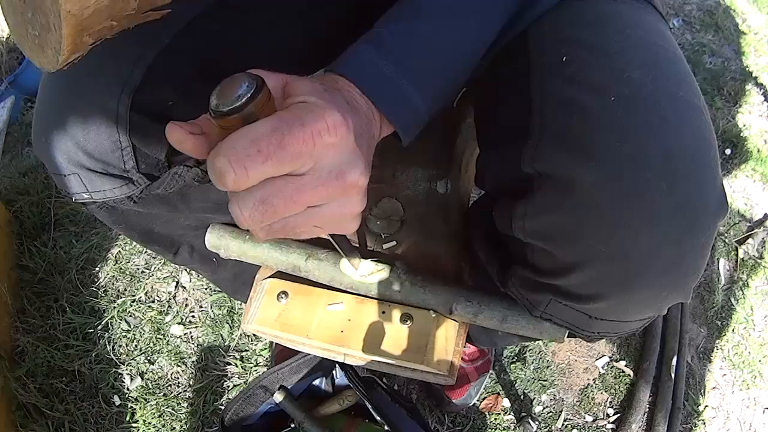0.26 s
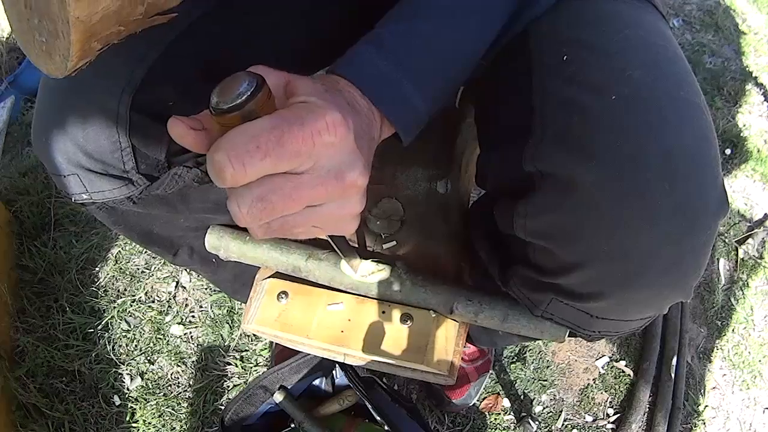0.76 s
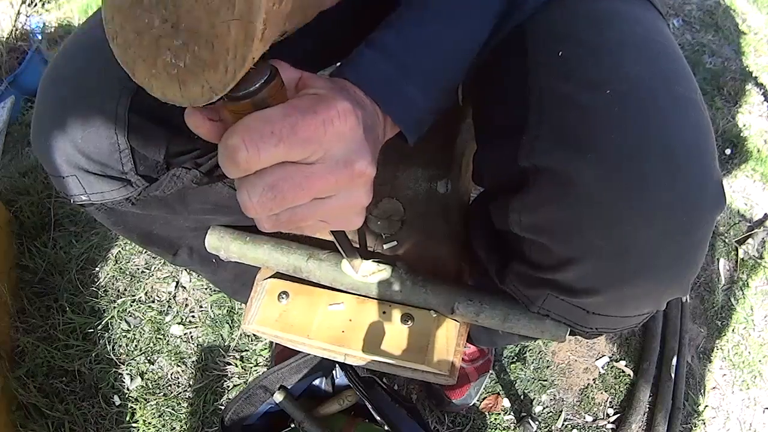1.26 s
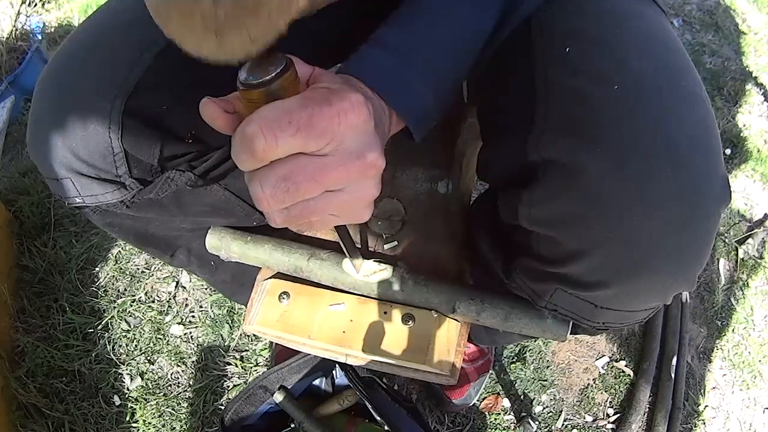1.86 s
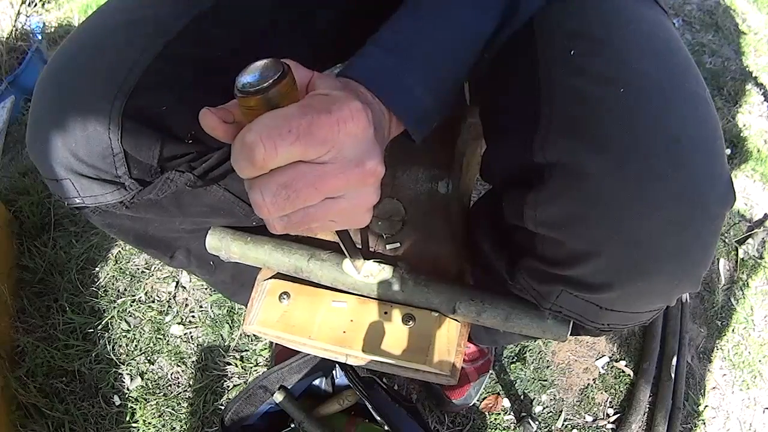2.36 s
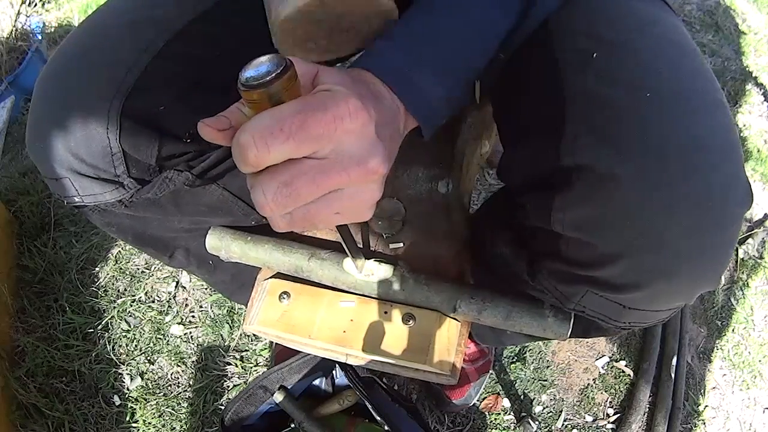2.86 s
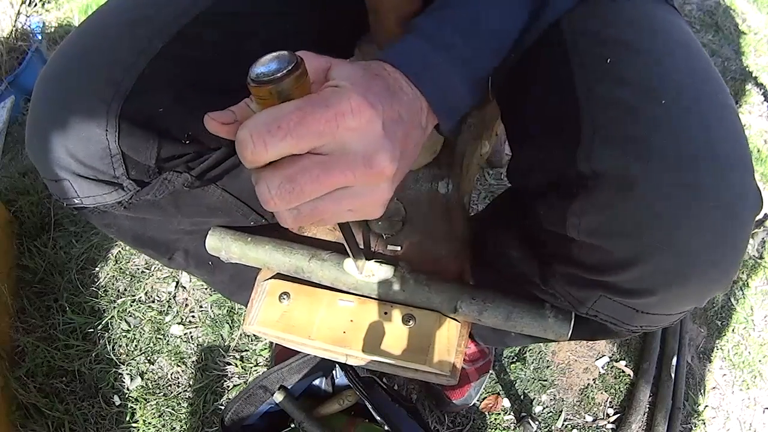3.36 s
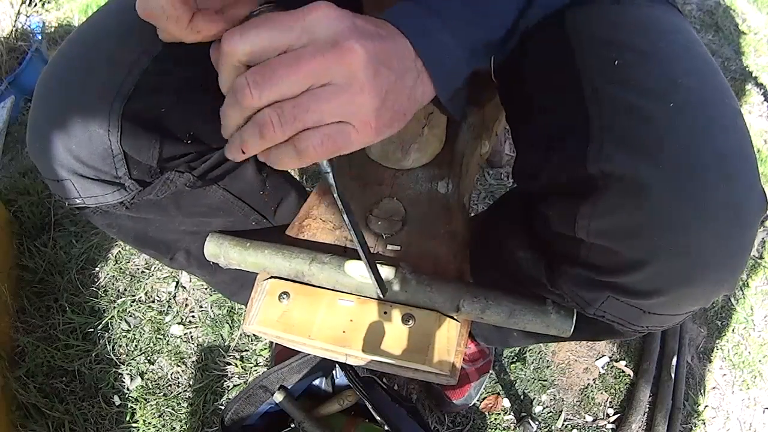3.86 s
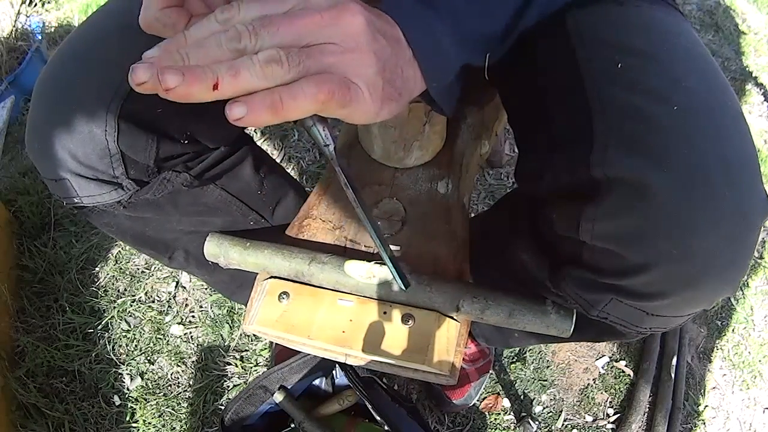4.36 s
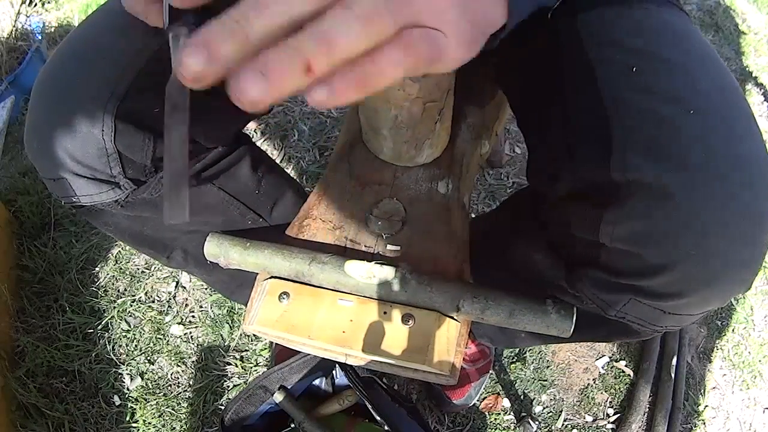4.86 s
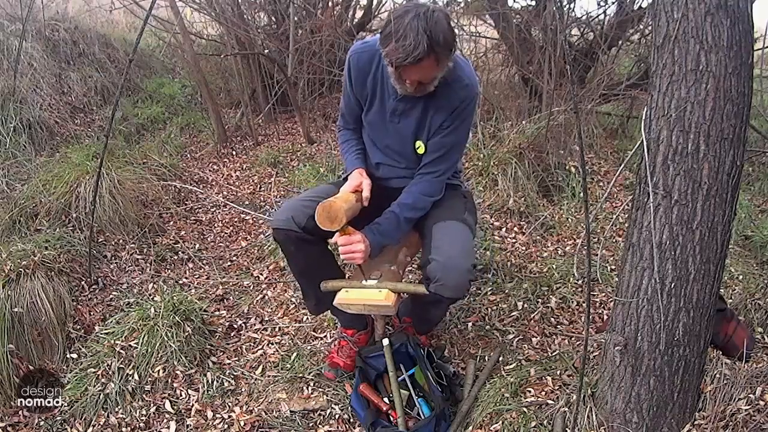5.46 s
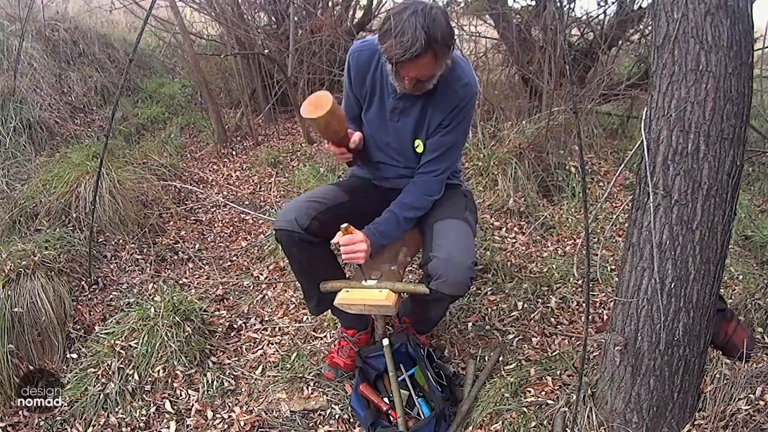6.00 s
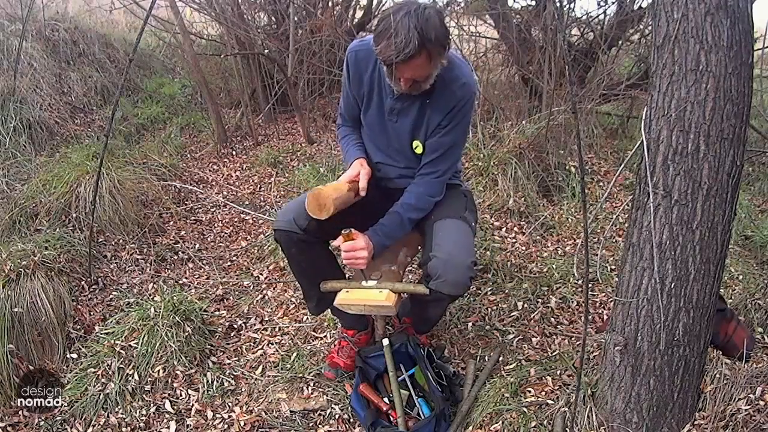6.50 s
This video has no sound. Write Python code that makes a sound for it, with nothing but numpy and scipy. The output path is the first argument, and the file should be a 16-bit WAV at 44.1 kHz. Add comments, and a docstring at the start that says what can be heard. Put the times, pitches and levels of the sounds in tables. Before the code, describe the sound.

A mallet cracks sharply on a chisel twice, wood clacks and taps lightly, then one more hard blow lands, outdoors.

```python
"""Chisel into green wood

Outdoors, three hard mallet blows drive a chisel into a green stick on a chopping block: the handle
cracks, fibres crush, and chisel, stick and block ring. Between blows the mallet slides down and is
laid aside, wood knocks on wood, steel and chips tick, and sleeves swish over quiet woodland air.
A dull low background noise swells after the second blow."""
import sys
import numpy as np
from scipy import signal
from scipy.fft import rfft, irfft, next_fast_len
from scipy.io import wavfile

SR = 44100
rng = np.random.default_rng(int(sys.argv[2]) if len(sys.argv) > 2 else 0)


def inscribe(sig):
    """Save sig as 16-bit PCM at rate SR to the path in sys.argv[1].

    A 1-D sig is mono; a 2-D sig holds one channel per row.
    Samples are clipped to [-1, 1] before scaling.
    """
    pcm = np.round(np.clip(np.atleast_2d(sig).T, -1, 1) * 32767)
    wavfile.write(sys.argv[1], SR, pcm.astype(np.int16))


N = 297054
TIME = np.arange(N) / SR
AGE = TIME[:SR // 2]   # seconds since a contact
PADDED = next_fast_len(N + 4096, True)
BINS_HZ = np.maximum(np.arange(PADDED // 2 + 1) * SR / PADDED, 1)
CUTOFF_HZ = 11080

# Mallet blows. Each row: start in seconds, crack in dB, chisel in dB, chisel brightness in dB per
# octave, stick in dB, stick pitch in Hz, block in dB, bite in dB, bite pitch in Hz, rebound delay
# in seconds, rebound in dB relative to the blow.
BLOWS = [(1.913, -15, -17, 1, -14, 336.4, -30, -10.5, 2424, .028, -20.5),
         (2.425, -26.5, -34.5, -1, -25, 333, -15.5, 0.5, 863, .0125, -3.5),
         (6.249, -15, -15, -1.5, -13.5, 320.6, -44, -5.5, 1580, .0295, -25)]
# Light knocks. Each row: start in seconds, note in dB, pitch in Hz, clack in dB, block in dB.
KNOCKS = [(2.969, -15.5, 325, -26.5, -39), (2.9865, -21.5, 307, -27.5, -42), (2.996, -26, 207, -52, -61),
          (3.245, -30, 403, -37.5, -35), (3.2661, -28, 380, -44, -33.5), (3.386, -39.5, 367, -58, -54),
          (3.473, -38.5, 354, -56, -55), (3.613, -32.5, 379, -55, -49), (3.731, -38.5, 368, -63, -62),
          (5.11, -43, 403, -60, -77), (5.1832, -23.5, 329, -41.5, -72), (5.27, -27.5, 327, -46, -70),
          (5.503, -43, 310, -65, -75), (6.159, -44, 320, -54, -75)]
# Ticks of steel and chips. Each row: start in seconds, level in dB, centre in Hz.
TICKS = [(0.2805, -47.5, 5140), (1.2157, -45, 3900), (2.502, -41.5, 3940), (2.966, -36, 6130),
         (3.055, -43, 5440), (4.821, -43, 7550), (5.193, -45.5, 3200), (5.2095, -41, 1190),
         (5.866, -50.5, 4950), (6.150, -35.5, 4700)]
# Noise swells. Each row: time of reaching full level, attack, hold and release, all in seconds,
# sleeve swish in dB, low background noise in dB.
SWELLS = [(2.289, 0.078, .03, 0.067, -50, -49.5), (2.456, 0.028, 0.025, 0.043, -54.5, -44.5),
          (2.72, 0.52, .1, .33, -63, -54.5), (4.697, 0.26, .02, 0.092, -59.5, -69),
          (5.16, 0.43, 0.065, 0.16, -72.5, -62), (5.493, 0.097, 0.024, 0.03, -58.5, -59.5),
          (6.604, 0.0044, 0.086, .015, -47.5, -57), (6.73, 0.022, .02, .03, -54.5, -68)]

# What rings at a blow. Each row: frequency in Hz, level in dB, time to fall 60 dB in seconds.
CHISEL_MODES = [(592, -2.5, 0.025), (830, -2.5, 0.031), (980, -1.5, 0.048), (1337, -9, 0.035),
                (1715, -3.5, 0.073), (1888, 1, 0.029), (2408, -10, 0.053), (2790, -13, 0.092),
                (3400, -20, 0.05), (4090, -18, 0.026), (4550, -19, 0.031), (5500, -16, 0.026),
                (6330, -8.5, 0.042), (6840, -8, 0.017)]   # with its wooden handle
CAP_MODES = [(2850, 6.5, 0.021)]   # the handle's cap, tapped on the rebound
BLOCK_MODES = [(85, -18, 0.16), (443.4, 3, 0.087), (459, -21.5, 0.4), (874, -22, 0.24), (1020, 13, 0.023),
               (1303, -1, 0.047), (1380, -18.5, 0.23), (1664, -35, 0.52), (1660, 1.5, .02),
               (1810, 1, 0.026), (2910, -12, 0.036), (4070, 3.5, 0.011), (4100, -21, 0.078),
               (5850, -27, 0.1), (7360, -25, 0.03)]
GROUND_MODES = [(75.4, -35, 0.14)]
# The stick on its support. Each row: multiple of its pitch, level in dB, time to fall 60 dB in seconds.
STICK_MODES = [(.43, -21.5, 0.18), (.58, -16, 0.046), (.86, -6.5, 0.086), (.93, -24, 0.32), (1, 1.5, 0.11),
               (1.15, -6, .05), (1.361, -12.5, 0.035), (2.475, -33, 0.47)]
# The note of a knock. Each row: multiple of its pitch, level in dB, share of its ring time.
KNOCK_MODES = [(1, 2, 0.91), (1.85, -14, 0.38)]

# EQ curves of the noise layers. Each row: frequency in Hz, relative level in dB.
CRACK_EQ = [(150, 9), (500, -14), (1300, -2), (2500, 0), (4000, -1), (6500, -7), (8500, -6), (11000, -11)]
FIBRE_EQ = [(30, -24), (100, -21), (180, 4), (400, 1), (650, -7.5), (950, -5.5), (1300, -6), (1900, -13),
            (2700, -10.5), (4000, -15.5), (6500, -20), (11000, -32)]
ECHO_EQ = [(60, -4), (160, 1.5), (300, -1.5), (550, -20), (900, -12), (1500, -6), (2500, -15), (6500, -18),
           (11000, -30)]
CLACK_EQ = [(100, -13), (300, -0.5), (650, -0.5), (1000, -2), (1400, -6.5), (2000, -16), (4000, -27),
            (11000, -34)]
SLIDE_EQ = [(150, 2), (400, -1), (1400, -9), (2200, -2), (4000, -1), (4900, -7), (6500, -4), (8500, -8),
            (11000, -10.5)]
SWISH_EQ = [(100, -7), (600, -24), (1100, -6.5), (1700, 1.5), (3000, -1), (6000, -1.5), (9000, -4),
            (11000, -7)]
LOW_BACKGROUND_EQ = [(25, 7), (55, 13), (120, 7.5), (250, 2), (600, 2.5), (1100, 2), (1700, -2.5),
                     (2500, -11), (11000, -17)]
AIR_EQ = [(22, -23), (40, -6), (70, 0.5), (120, -3.0), (160, -9.5), (260, -13), (400, -14), (600, -14),
          (950, -12.5), (1300, -16), (2000, -18), (4000, -23.5), (7000, -26.5), (10500, -30)]

# Stereo phase of the close work and of the air. Each row: frequency in Hz, left lead in radians.
NEAR_PHASE = [(50, 0), (170, -.9), (500, -.95), (1700, -1.15), (3000, -.7), (6000, -.35), (11000, -.1)]
AIR_PHASE = [(80, 0), (170, -.3), (350, -.8), (520, -1.9), (1000, -2.2), (2000, -3), (3500, -2.5),
             (5000, -.8), (7000, -.1)]
# Pan of the close work. Each row: frequency in Hz, left over right in dB.
NEAR_BALANCE = [(100, 0.5), (350, -1), (700, -3), (1000, -1.7), (1700, 0), (3000, -.8), (11000, -1)]
# Stereo width of the noise. Each row: frequency in Hz, left-right likeness from 0 (wide) to 1 (mono).
NEAR_LIKENESS = [(60, 1), (250, 0.88), (2000, 0.85), (11000, 0.87)]
AIR_LIKENESS = [(30, 0.9), (90, 0.96), (200, 0.84), (400, 0.34), (2000, 0.62), (4500, 0.17), (10000, 0.53)]


def blows():
    """The mallet hits the handle, the edge bites, stick and block ring; the mallet bounces once."""
    tones, contacts = np.zeros(N), []
    block = ring(BLOCK_MODES, rise_cycles=4.6)
    cap = ring(CAP_MODES, rise_cycles=2.6)
    thud = ring(GROUND_MODES, rise_cycles=0.53)
    damping = np.maximum(loaded(hold_s=0.05), from_db(-3.5))   # the stick is never fully muted
    for (s, crack_db, chisel_db, brightness, stick_db, stick_hz, block_db,
         bite_db, bite_hz, rebound_s, rebound_db) in BLOWS:
        tilted = [(hz, db + brightness * np.log2(hz / 1800), t60) for hz, db, t60 in CHISEL_MODES]
        chisel = from_db(chisel_db) * ring(tilted, rise_cycles=2.4)
        tuned = [(stick_hz * k, db, t60) for k, db, t60 in STICK_MODES]
        stick = from_db(stick_db) * ring(tuned, rise_cycles=2.48) * damping
        add(tones, s, chisel + stick + from_db(block_db) * block + thud)
        # a brief squeak as the edge enters green wood
        add(tones, s + 0.001027, ring([(bite_hz, bite_db, .021)], rise_cycles=2.94))
        add(tones, s + rebound_s, from_db(rebound_db) * (chisel + from_db(crack_db) * cap))
        contacts += [(s, crack_db), (s + rebound_s, crack_db + rebound_db)]
    times, levels_db = np.transpose(contacts)
    return tones + crack(times, levels_db) + fibres(times, levels_db) + echo(times, levels_db)


def crack(times, levels_db, peak_db=7, width_hz=110):
    """A hard touch, then a rattle; the slim handle lifts the noise at its modes and radiates no bass."""
    touch = from_db(3.5) * decay(t60=0.012, rise_s=0.00018)
    rattle = from_db(-1) * decay(t60=0.028, rise_s=0.0018)
    peaks = [1 / (1 + (2 * (BINS_HZ - hz) / width_hz) ** 2) for hz, _, _ in CHISEL_MODES]
    handle = noise(CRACK_EQ, peaks_db=peak_db * np.max(peaks, axis=0))
    low_cut = signal.butter(2, 300, "high", fs=SR, output="sos")
    return signal.sosfilt(low_cut, bursts(times, levels_db, touch + rattle) * handle)


def fibres(times, levels_db):
    """Green fibres give way in a grainy crunch while the edge bears on them."""
    crush = decay(t60=0.62, rise_s=0.0023) * loaded(hold_s=0.036)
    return bursts(times, levels_db - 12.5, crush) * noise(FIBRE_EQ) * grain(per_s=870, depth_db=2.0)


def echo(times, levels_db):
    """Trunks and undergrowth scatter a faint tail back."""
    return from_db(-28.5) * bursts(times, levels_db, decay(t60=0.47, rise_s=0.017)) * noise(ECHO_EQ)


def knocks(ring_s=0.041):
    """Wood lands lightly on wood: a dull clack, a short low note and a little body from the block."""
    tones = np.zeros(N)
    block = ring(BLOCK_MODES[1:4], rise_cycles=0.89)
    for s, db, hz, _, block_db in KNOCKS:
        modes = [(k * hz, mode_db, share * ring_s) for k, mode_db, share in KNOCK_MODES]
        add(tones, s, from_db(db) * ring(modes, rise_cycles=0.77) + from_db(block_db) * block)
    times, _, _, clack_db, _ = np.transpose(KNOCKS)
    return tones + bursts(times, clack_db, decay(t60=0.052, rise_s=0.0011)) * noise(CLACK_EQ)


def mallet_slide(start_s=2.901, hold_s=0.149, landing_s=2.979):
    """The mallet scrapes onto the block with a gritty, rising rasp, pressing hardest as it lands."""
    touching = swell(start_s, attack_s=0.0024, hold_s=hold_s, release_s=0.018)
    pressure = swell(landing_s, attack_s=0.038, hold_s=0, release_s=0.038)
    rasp_hz = 5230 + 8900 * np.clip(TIME - start_s, 0, hold_s)
    narrow = noise([(910, 0), (9100, -60)])   # low noise, shifted up to a band around rasp_hz
    rasp = narrow * np.sqrt(2) * np.cos(2 * np.pi * np.cumsum(rasp_hz) / SR)
    scrape = (noise(SLIDE_EQ) + from_db(-4) * rasp) * grain(per_s=450, depth_db=3.0)
    return from_db(-52 + 7.5 * pressure) * touching * scrape


def ticks(half_width_octaves=0.64, chips_per_s=1.6, chip_db=-55.5, chip_hz=5500):
    """Steel and chips snap in tiny bursts of pitched noise; fainter chips tick at random."""
    track, shape = np.zeros(N), decay(t60=0.016, rise_s=0.00048)
    chips = [(s, chip_db, chip_hz) for s in TIME[rng.random(N) < chips_per_s / SR]]
    spread = 2 ** half_width_octaves
    for s, db, hz in TICKS + chips:
        band = signal.butter(2, [hz / spread, hz * spread], "band", fs=SR, output="sos")
        snap = signal.sosfilt(band, rng.standard_normal(len(AGE)))
        add(track, s, from_db(db) * shape * snap / snap.std())
    return track


def sleeves():
    """Sleeves swish in soft swells of bright, grainy noise."""
    level = np.linalg.norm([from_db(db) * swell(*timing) for *timing, db, _ in SWELLS], axis=0)
    return level * noise(SWISH_EQ) * grain(per_s=320, depth_db=1.5) * grain(per_s=45, depth_db=1.5)


def low_background():
    """A dull low background noise comes and goes, swelling most after the second blow."""
    level = np.linalg.norm([from_db(db) * swell(*timing) for *timing, _, db in SWELLS], axis=0)
    return level * noise(LOW_BACKGROUND_EQ)


def woodland_air():
    """A steady bed of soft rumble under a faint, wider hiss."""
    return from_db(-54) * noise(AIR_EQ, AIR_LIKENESS)


def ring(modes, rise_cycles):
    """Damped modes of alternating sign; each takes some cycles to build, so the lows bloom last."""
    return sum((-1) ** k * from_db(db) * decay(t60, rise_cycles / hz) * np.sin(2 * np.pi * hz * AGE)
               for k, (hz, db, t60) in enumerate(modes))


def decay(t60, rise_s):
    """Envelope that builds over rise_s and falls 60 dB in t60 seconds."""
    return (1 - np.exp(-(AGE / rise_s) ** 2)) * np.exp(-np.log(1000) * AGE / t60)


def loaded(hold_s):
    """The edge bears on the wood for a moment; then the grip mutes it."""
    return 1 / np.sqrt(1 + (AGE / hold_s) ** 8)


def swell(s, attack_s, hold_s, release_s):
    """A smooth rise to full strength at time s, a hold and a smooth fall."""
    early, late = np.maximum(s - TIME, 0), np.maximum(TIME - s - hold_s, 0)
    return np.exp(-np.minimum((early / attack_s) ** 2 + (late / release_s) ** 2, 20))


def bursts(times, levels_db, shape):
    """One envelope per contact, summed in power."""
    power = np.zeros(N)
    for s, db in zip(times, levels_db):
        add(power, s, (from_db(db) * shape) ** 2)
    return np.sqrt(power)


def noise(eq, likeness=NEAR_LIKENESS, peaks_db=0):
    """Stereo noise with a given EQ and width; rms 1."""
    mid, side = rfft(rng.standard_normal((2, PADDED)))
    alike = np.clip(at_hz(likeness), 0, 1)
    pair = np.sqrt(1 + alike) * mid + np.sqrt(1 - alike) * side * [[1], [-1]]
    audible = (BINS_HZ > 20) & (BINS_HZ < CUTOFF_HZ + 500)
    coloured = irfft(pair * from_db(at_hz(eq) + peaks_db) * audible, PADDED)[:, :N]
    return coloured / coloured.std()


def grain(per_s, depth_db):
    """Uneven gain of fibres catching and letting go; rms 1."""
    jitter = np.interp(TIME * per_s, np.arange(N), rng.standard_normal(N))
    gain = from_db(depth_db * np.clip(jitter, -2, 2))
    return gain / np.sqrt(np.mean(gain ** 2))


def stereo_image(sound, phase, balance_db=0):
    """Two close microphone ports hear the sound with a shift in phase and level."""
    left = np.exp(1j * at_hz(phase) / 2) * from_db(balance_db / 2)
    return irfft(rfft(sound, PADDED) * np.array([left, 1 / left]), PADDED)[:, :N]


def from_db(db):
    """Decibels to gain."""
    return np.exp(np.asarray(db) * np.log(10) / 20)


def at_hz(points):
    """A curve read at every frequency bin, on a log axis."""
    hz, value = np.transpose(points)
    return np.interp(np.log(BINS_HZ), np.log(hz), value)


def add(track, s, sound):
    """Mix a short sound into a track at time s."""
    start = round(s * SR)
    track[start:start + len(sound)] += sound[:N - start]


def scene():
    """The work and the low swells in front, the open air all round."""
    air = woodland_air()
    front = blows() + knocks() + sleeves() + low_background() + mallet_slide() + ticks()
    return stereo_image(front, NEAR_PHASE, at_hz(NEAR_BALANCE)) + stereo_image(air, AIR_PHASE)


def record(dry, ceiling=0.4):
    """The level dips briefly before the second blow, peaks are soft-clipped, the top is cut steeply."""
    dip = from_db(np.interp(TIME, [2.415, 2.417, 2.421, 2.423], [0, -22, -22, 0]))
    rounded = ceiling * np.tanh(dry * dip / ceiling)
    high_cut = signal.ellip(12, .1, 70, CUTOFF_HZ, fs=SR, output="sos")
    return signal.sosfilt(high_cut, rounded)


dry = scene()
out = record(dry)
inscribe(out)
```